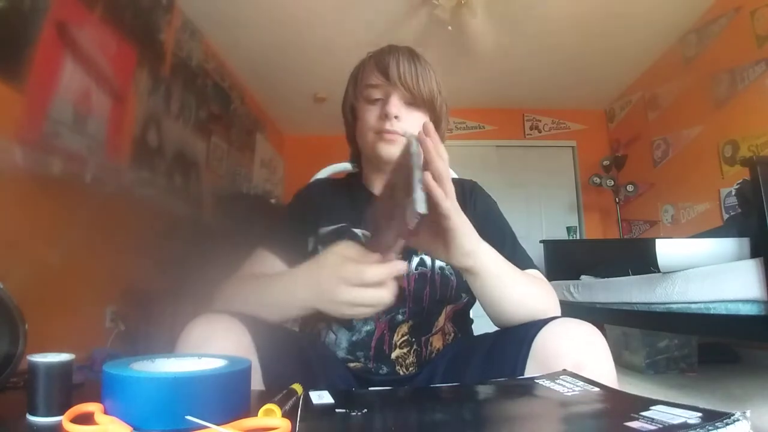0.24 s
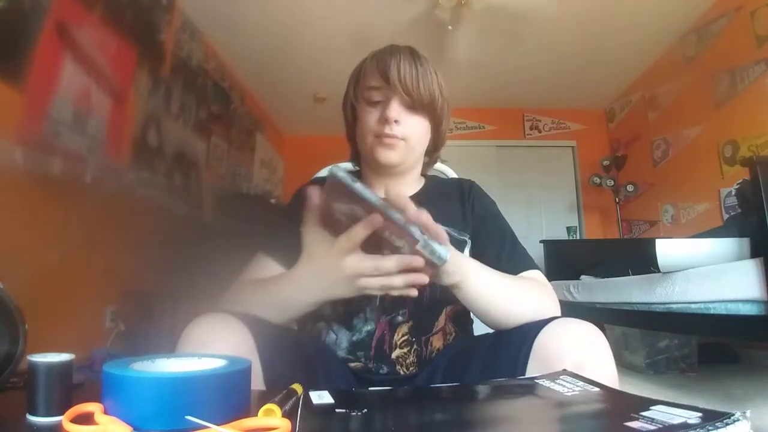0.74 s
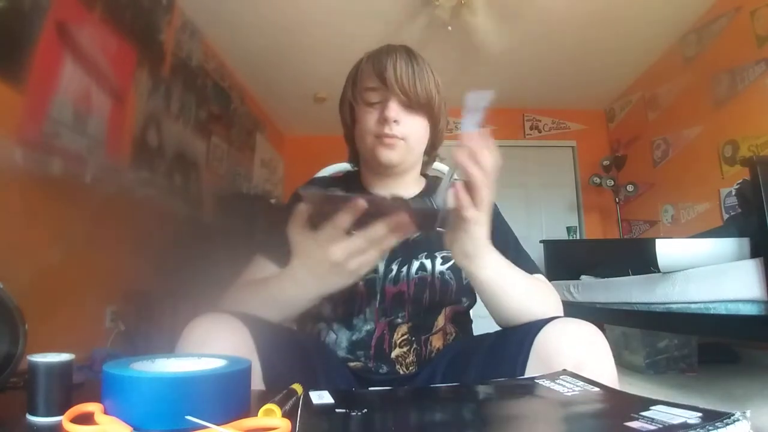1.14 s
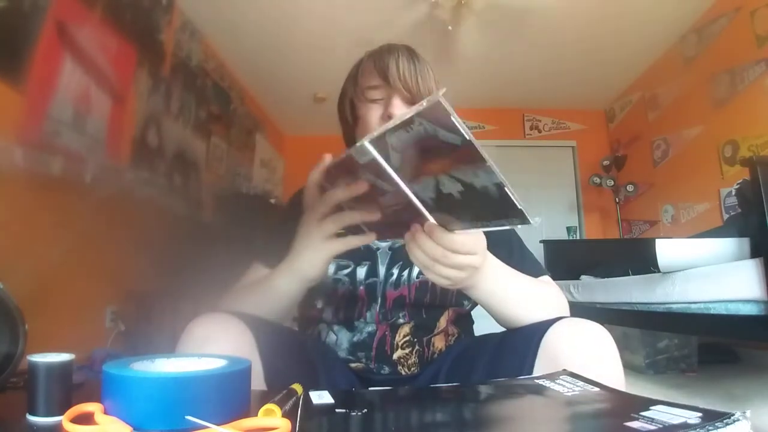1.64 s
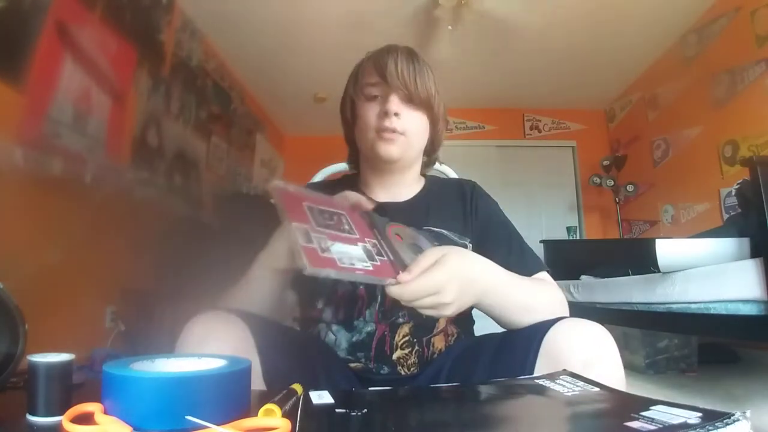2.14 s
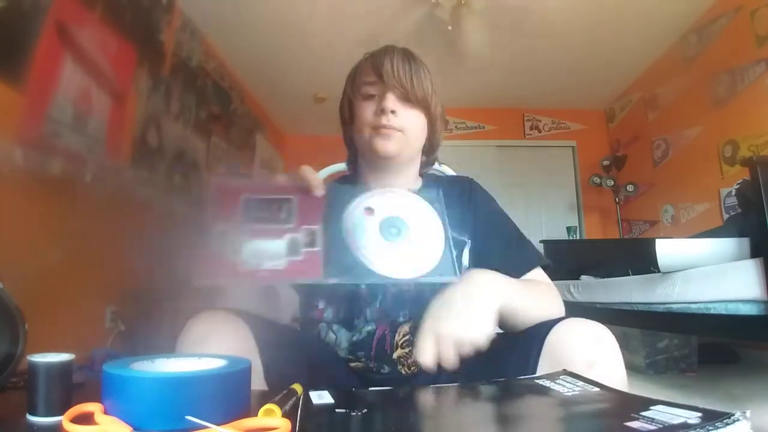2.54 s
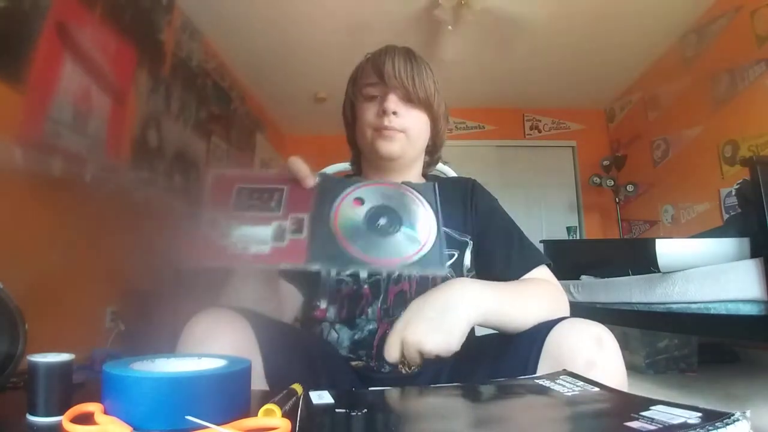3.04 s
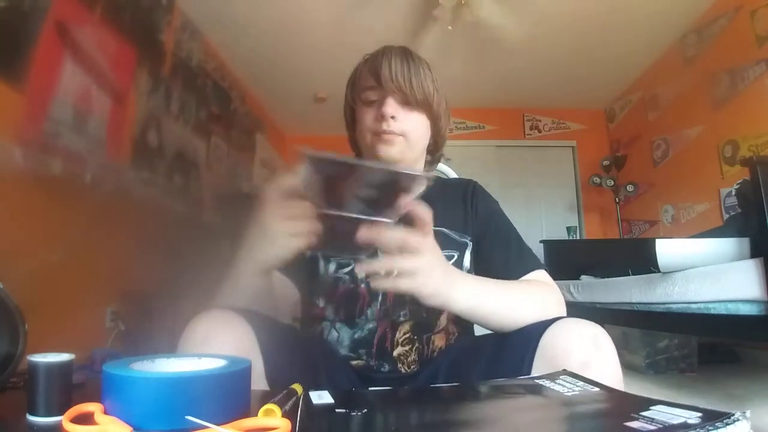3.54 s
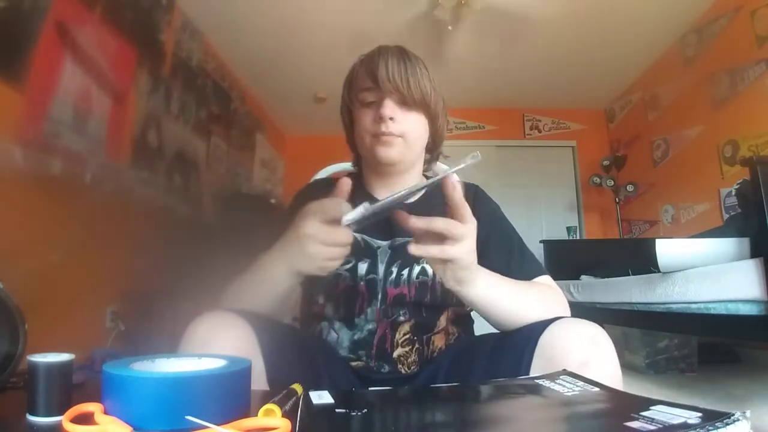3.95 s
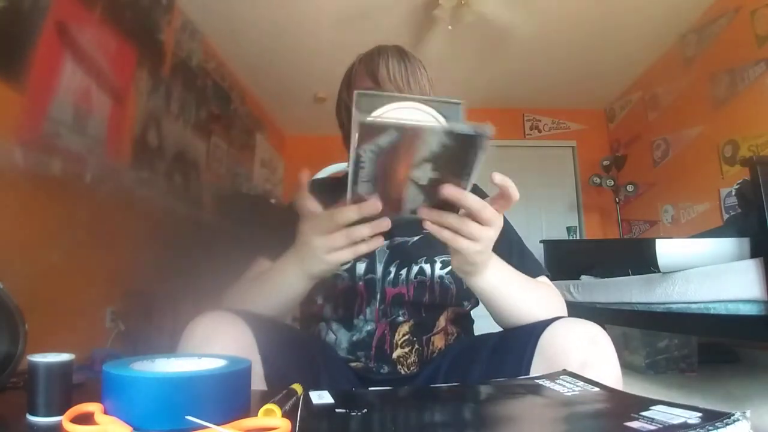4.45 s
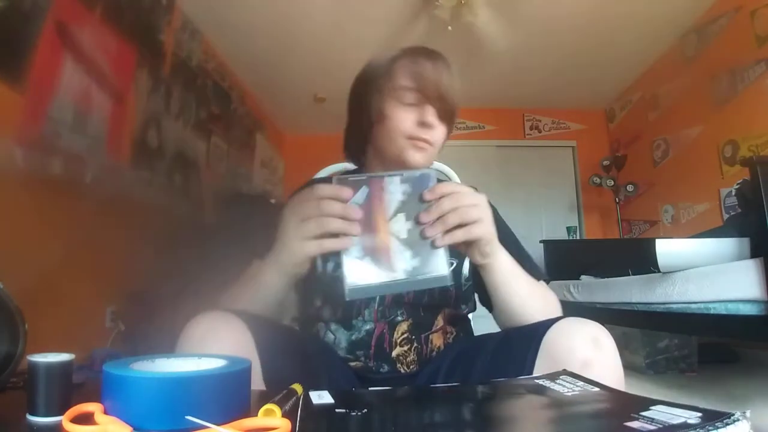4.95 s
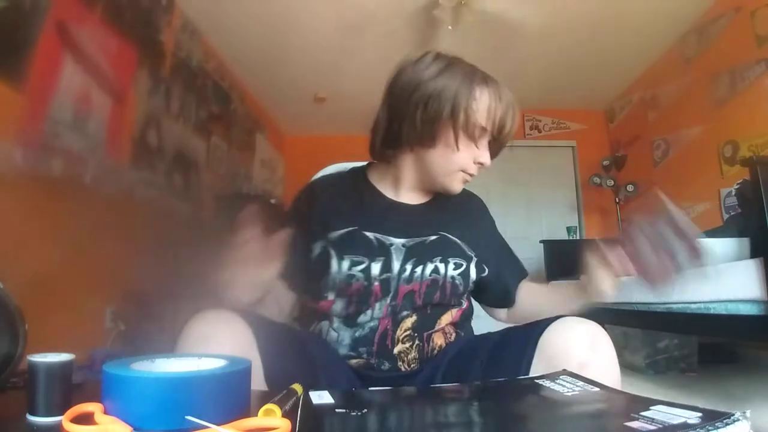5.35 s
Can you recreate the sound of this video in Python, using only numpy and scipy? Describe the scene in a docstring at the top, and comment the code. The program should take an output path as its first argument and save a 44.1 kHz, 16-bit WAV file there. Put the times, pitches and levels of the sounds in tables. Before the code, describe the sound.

A thin plastic disc case is turned over and prised open, giving light, irregular clicks and faint scrapes of fingers and edges. About halfway through, a hand knocks softly once on a table. A quick run of clicks follows as the case swings shut, then two loud, sharp snaps as its catches close. The sounds are fairly near, in a small room with a brief echo and a soft, steady rush of air.

```python
"""In a small bedroom, a plastic disc case is turned over and prised open. Each contact is a short crack
plus the ringing of the thin shells; fingers and edges scrape in between. About halfway through, a
hand knocks once on the table. The case is swung shut and pressed until its two catches snap.
All along, the room answers briefly, over a soft steady rush of air."""
import sys
import numpy as np
from scipy import signal
from scipy.fft import rfft, irfft, next_fast_len
from scipy.io import wavfile
from scipy.ndimage import map_coordinates

SR = 44100
rng = np.random.default_rng(int(sys.argv[2]) if len(sys.argv) > 2 else 0)


def digitize_waveform(pressure):
    """Quantize a signal to 16-bit integers and store it at the path in sys.argv[1].

    Rows of a 2-D input are taken as channels; values are limited to [-1, 1].
    """
    field = np.atleast_2d(pressure).T
    bounded = np.clip(field, -1, 1)
    quanta = np.round(bounded * 32767).astype(np.int16)
    wavfile.write(sys.argv[1], SR, quanta)


N = 247621
LIGHT_DB, HARD_DB = -36.5, -25  # where a light touch ends and a hard blow begins

# Lid, tray and fingers meeting: start_s, level_db, pitch_hz (of the spot struck), treble_db
CONTACTS = [(0.069, -37.5, 1490, -10), (0.1314, -26.5, 1600, -12), (0.2673, -44, 1390, -20.5),
            (0.3016, -42.5, 1530, -21), (0.4513, -41.5, 1610, -18), (0.5003, -30, 1530, -11),
            (0.5589, -36, 1570, -7.5), (0.6721, -41.5, 1410, -22), (0.712, -38, 1850, -16),
            (0.9752, -43.5, 2270, -23), (0.9904, -32, 2140, -20), (1.057, -42.5, 3530, -18),
            (1.2833, -38.5, 3700, -16), (1.3009, -24.5, 3230, -10.5), (1.5887, -46.5, 2980, -15),
            (1.6421, -51, 2535, -20), (1.7599, -51.5, 1460, -26), (1.953, -49, 3500, -6),
            (2.0297, -32, 3080, -19.5), (2.0931, -44.5, 2080, -27), (2.138, -53.5, 2410, -12),
            (2.4428, -35, 1340, -9), (2.6105, -43.5, 2240, -16.5), (2.6383, -45.5, 1086, -17),
            (2.7909, -41.5, 3220, -18), (3.0993, -40, 3270, -15), (3.1099, -34.5, 2990, -20),
            (3.13, -34.5, 2403, -12), (3.1721, -34.5, 2620, -10.5), (3.1842, -33.5, 3030, -20),
            (3.2073, -42, 3606, -26), (3.2333, -29, 2030, -15.5), (3.252, -29, 2940, -10.5),
            (3.2995, -35.5, 3000, -28), (3.3153, -30.5, 2260, -12), (3.4393, -42, 2440, -27),
            (3.5792, -32.5, 2287, -18), (3.8424, -43, 2120, -18), (4.0357, -45, 1360, -19),
            (4.1205, -45.5, 3750, -14.5), (4.376, -41, 3500, -7.5), (4.3908, -37.5, 3450, -15.5),
            (4.4393, -45, 3270, -11), (4.5465, -13, 2900, -13), (4.7083, -27, 2645, -17),
            (4.7675, -12.5, 1880, -9.5), (4.9366, -31.5, 1930, -11), (5.128, -41, 1180, -16)]


def case_clicks(touch_db=-13, touch_lead_s=0.0027):
    """Edges touch lightly, then slip home with a click; strength and spot set its tone."""
    track = np.zeros(N)
    for start_s, level_db, pitch_hz, treble_db in list(CONTACTS) + edge_snags():
        # the face sounds low and hollow, the rim high and thin
        hollow_db = -4 - 5.5 * np.log2(pitch_hz / 1300)
        # the thump of the finger pads hardly grows with the blow
        thump_db = hollow_db - 10.5 - 0.59 * (level_db - LIGHT_DB)
        tone = [(600, thump_db), (850, hollow_db), (1600, hollow_db),
                (2000, 0.00053), (4000, 0.014), (5200, treble_db)]
        gain = amp(level_db - 7) * np.linalg.norm(amp([0, thump_db, hollow_db, treble_db]))
        touch = amp(touch_db) * gain * click(level_db + touch_db, tone, pitch_hz)
        add(track, start_s - touch_lead_s, touch)
        # a hard blow layers three clicks for a fuller snap and a smoother echo
        layers = 3 if level_db > HARD_DB else 1
        for _ in range(layers):
            blow = gain / np.sqrt(layers) * click(level_db, tone, pitch_hz)
            add(track, start_s, room(blow, echo_db=-6.5))
    return track


# The basic tone of a crack, from bass to treble: pitch_hz, level_db
CRACK_TONE = [(60, -35), (160, -1.5), (250, 8.5), (600, 19), (900, 0), (1500, 3), (2100, -1.5), (3900, -2),
              (4500, -6.5), (5200, 2), (6600, -5), (8000, -2.5), (10000, -11.5), (15500, -19)]
# The notes of the shells, struck on the stiff rim or the bendy face: pitch_hz, rim_db, face_db
SHELL_NOTES = [(239, -12.5, -11.5), (386, -19, -6.5), (569, -7, -11.5), (693, -12, -5.5),
               (1146, -23.5, -9.5), (1335, -13, -4), (1579, -4.5, -2), (1740, -5, -20), (1982, -20.5, -3),
               (2166, -5.5, -0.5), (2518, 2, -6.5), (3047, 0.5, -17), (3264, -5.5, 4), (3335, 5, 0),
               (3960, -19.5, -9), (4663, -7, -2.5)]


def click(level_db, tone, pitch_hz, crack_fade_s=0.029, ring_fade_s=0.042, rise_s=0.0003):
    """One contact cracks and sets the shells ringing; the edges chatter longer after a harder blow."""
    t = np.arange(SR // 10) / SR
    force = np.clip((level_db - LIGHT_DB) / 19, 0, 1)
    chatter_s = force * 0.0043
    fading_s = np.maximum(t - chatter_s, 0)
    crack = coloured(rng.standard_normal(len(t)), lambda hz: along(CRACK_TONE, hz) + along(tone, hz))
    crack *= fade(fading_s, crack_fade_s)
    note_hz, rim_db, face_db = np.transpose(SHELL_NOTES)
    notes = np.sin(2 * np.pi * (note_hz[:, None] * t + rng.random((len(note_hz), 1))))
    # a hard snap shakes the whole shell; the face rings lower than the rim
    face_share = np.interp(pitch_hz, [2200, 2800], [1, 0])
    shell = unit(amp(rim_db + face_share * (face_db - rim_db)) @ notes)
    # a light touch wakes only the notes near the pitch of its spot
    octaves_away = np.log2(note_hz / pitch_hz)
    spot = unit(np.exp(-(octaves_away / 0.18) ** 2 / 2) @ notes)
    ring = (force * amp(-1.5) * shell + (1 - force) * amp(-6) * spot) * fade(fading_s, ring_fade_s)
    sound = (crack + ring) * (1 - np.exp(-t / rise_s))
    return sound / np.std(sound[:SR // 200])  # same strength over the first 5 ms


# Edges and skin scraping the plastic: start_s, length_s, level_db, pitch_hz (of the spot scraped)
SCRAPES = [(0.386, 0.083, -64, 1500), (0.495, 0.025, -50.5, 1610), (0.549, .02, -55, 1470),
           (0.87, 0.015, -80, 1577), (.982, .035, -51, 2460), (1.038, 0.062, -62, 2800),
           (1.297, 0.037, -48, 3500), (1.539, 0.13, -67, 3100), (2.01, .13, -63.5, 2800),
           (2.433, 0.11, -65, 2970), (2.611, 0.191, -70.5, 2960), (3.125, 0.21, -55, 3120),
           (3.584, 0.038, -54, 2660), (4.163, 0.026, -64.5, 1800), (4.371, 0.036, -56.5, 3670),
           (4.484, 0.44, -62, 2600), (4.944, 0.059, -57, 1500), (5.078, .1, -61, 1490),
           (5.412, 0.03, -72.5, 2390)]
# The tone of a scrape: pitch_hz, level_db
SCRAPE_TONE = [(150, -30.5), (300, 8), (900, -1.5), (1500, 1.5), (3900, 4.5), (5500, -7.5), (8200, -8.5),
               (11000, -36.5), (15500, -36)]
# The notes that rubbing wakes in the lid: pitch_hz, width_hz, boost_db
LID_NOTES = [(1089, 110, 14), (2246, 55, 2.5), (3600, 57, -5)]


def scraping(slips_per_s=500, slip_fade_s=0.02, smooth_share=0.22):
    """A sliding edge sticks and slips, making tiny ticks of uneven size."""
    slips = rng.random(N) < slips_per_s / SR
    sizes = amp(2 * np.minimum(rng.exponential(size=N), 2))
    ticks = signal.fftconvolve(slips * sizes, fade(np.arange(SR // 10) / SR, slip_fade_s))[:N]
    rub = coloured(rng.standard_normal(N), lambda hz: along(SCRAPE_TONE, hz) + humps(LID_NOTES, hz))
    grip = (0, 5.2, -72)  # the hands rub faintly for as long as they hold the case
    pressure = strokes(list(SCRAPES) + [grip], rise_s=0.02, fade_s=0.2)
    return pressure * unit(rub * (smooth_share + unit(ticks)))


def edge_snags(snags_per_s=45, spread_db=10.5, spread_octaves=0.49, treble_db=-15.5):
    """A scraping edge snags at random; each snag becomes a row like those of CONTACTS."""
    rows = []
    for start_s, length_s, level_db, pitch_hz in SCRAPES:
        for k, (delay, size, spot) in enumerate(rng.random((24, 3))):
            after_s = (k + delay) / snags_per_s
            if after_s < length_s:
                snag_db = level_db + 5 + spread_db * size
                snag_hz = pitch_hz * 2 ** (spread_octaves * (spot - 0.5))
                rows.append((start_s + after_s, snag_db, snag_hz, treble_db))
    return rows


# Fingertips brushing the lid: start_s, length_s, level_db
SWISHES = [(.53, .14, -64.5), (1.0, .28, -72.5), (4.93, .26, -70.5), (5.46, 0.031, -74.5)]
# The tone of their hiss: pitch_hz, level_db
SKIN_TONE = [(1000, -20), (4000, 1.5), (8000, 4), (11000, -3), (15000, -3.5)]


def fingertips():
    """Dry skin lands gently, hisses over the smooth lid and lifts off."""
    hiss = coloured(rng.standard_normal(N), lambda hz: along(SKIN_TONE, hz))
    return strokes(SWISHES, rise_s=0.03, fade_s=0.29) * hiss


# The low notes of the table top: pitch_hz, level_db, fade_s
TABLE_NOTES = [(279, -41.5, 0.071), (404, -36, 0.075), (472, -28.5, 0.038), (624, -35, 0.058)]


def table_knock(start_s=2.4335, rise_s=0.0022):
    """A soft hand drops on the table and wakes only its low notes."""
    t = np.arange(SR // 4) / SR
    knock = sum(amp(db) * fade(t, fade_s) * np.sin(2 * np.pi * hz * t) for hz, db, fade_s in TABLE_NOTES)
    track = np.zeros(N)
    add(track, start_s, room(knock * (1 - np.exp(-t / rise_s)), echo_db=-9))
    return track


# How long the bedroom's echo lasts: pitch_hz, fade_s
ECHO_FADES = [(200, 0.27), (1000, 0.31), (3000, 0.24), (8000, 0.3), (15000, 0.21)]
# The tone that the walls give the echo: pitch_hz, level_db
ECHO_TONE = [(200, 7.5), (600, 5.5), (1500, 3), (3500, 1), (6000, -2.5), (14000, 4.5)]


def room(sound, echo_db, build_s=0.0017, ceiling_s=0.012, ceiling_db=-8):
    """Add one dull bounce off the ceiling and a blurred echo off the walls, new on every call."""
    hz, t, noise = signal.stft(rng.standard_normal(SR // 2), SR, nperseg=256)
    dying = amp(along(ECHO_TONE, hz)[:, None]) * fade(t, along(ECHO_FADES, hz)[:, None])
    building = 1 - np.exp(-(t / build_s) ** 2)
    echo = signal.istft(noise * dying * building, SR, nperseg=256)[1]
    response = amp(echo_db) * echo / np.linalg.norm(echo)
    response[0] += 1  # the sound that comes straight to the ear
    dull = signal.butter(2, [800, 2100], "bandpass", fs=SR, output="sos")
    bounce = signal.sosfilt(dull, signal.unit_impulse(SR // 100))
    add(response, ceiling_s, amp(ceiling_db) * bounce)
    return signal.fftconvolve(sound, response)


# The tone of the rushing air: pitch_hz, level_db
AIR_TONE = [(25, -40), (60, -25.5), (115, -13.5), (155, -21), (246, -11), (274, -5), (389, -10.5),
            (469, -5.5), (552, -6), (741, -6.5), (826, -17.5), (1300, -18.5), (2010, -25.5), (3260, -26),
            (4870, -37.5), (15500, -34.5)]
# Narrow bands that stand out of it: pitch_hz, width_hz, boost_db
AIR_HUMPS = [(292.5, 18, 8.5), (458, 22, 7)]


def air(level_db=-62.5):
    """A soft, steady rush of air fills the room."""
    rush = coloured(rng.standard_normal(N), lambda hz: along(AIR_TONE, hz) + humps(AIR_HUMPS, hz))
    return amp(level_db) * rush


def amp(db):
    """Turn decibels into a number to multiply by."""
    return 10 ** (np.asarray(db) / 20)


def fade(t, fade_s):
    """Die away by 60 dB every fade_s seconds."""
    return amp(-60 * t / fade_s)


def unit(sound):
    """Scale a sound to an average strength (rms) of 1."""
    return sound / np.sqrt(np.mean(sound ** 2) + 1e-20)


def along(points, hz):
    """Read between (pitch_hz, value) points, with octaves evenly spaced."""
    pitches, values = np.transpose(points)
    return np.interp(np.log(hz + 1), np.log(pitches + 1), values)


def humps(rows, hz):
    """The boost in dB that (pitch_hz, width_hz, boost_db) rows give at each pitch."""
    return sum(db / (1 + (2 * (hz - centre) / width) ** 2) for centre, width, db in rows)


def coloured(sound, gain_db):
    """Turn each pitch up or down by gain_db(hz), then scale to strength 1."""
    size = next_fast_len(len(sound) + 2048)
    gains = amp(gain_db(np.fft.rfftfreq(size, 1 / SR)))
    return unit(irfft(rfft(sound, size) * gains, size)[:len(sound)])


def strokes(rows, rise_s, fade_s):
    """Loudness over time: each stroke swells, holds for its length and dies away."""
    t = np.arange(N) / SR
    gains = []
    for start_s, length_s, level_db, *_ in rows:
        swell = np.clip(1 + (t - start_s) / rise_s, 0, 1)
        gains.append(amp(level_db) * swell * fade(np.maximum(t - start_s - length_s, 0), fade_s))
    return np.linalg.norm(gains, axis=0)


def wobble(points_per_s):
    """A smooth curve through random points."""
    return map_coordinates(rng.standard_normal(1024), [np.arange(N) * points_per_s / SR], mode="wrap")


def add(track, start_s, sound):
    """Mix a sound into the track from start_s on."""
    part = track[max(round(start_s * SR), 0):][:len(sound)]
    part += sound[:len(part)]


def scene(lowest_hz=205):
    """The handled case in its room, with the deep bass cut from the handling sounds."""
    background = air()
    sliding = scraping() + fingertips()
    tremble = amp(2.5 * wobble(points_per_s=30))  # fingers never press steadily
    handling = room(tremble * sliding, echo_db=-13)[:N] + table_knock() + case_clicks()
    bass_cut = signal.butter(6, lowest_hz, "highpass", fs=SR, output="sos")
    return (background + signal.sosfilt(bass_cut, handling))[None]


def record(dry, top_hz=15900):
    """Cut away the very highest treble, above top_hz."""
    size = next_fast_len(N + SR // 2)
    kept = np.fft.rfftfreq(size, 1 / SR) < top_hz
    return irfft(rfft(dry, size) * kept, size)[..., :N]


dry = scene()
out = record(dry)
digitize_waveform(out)
```